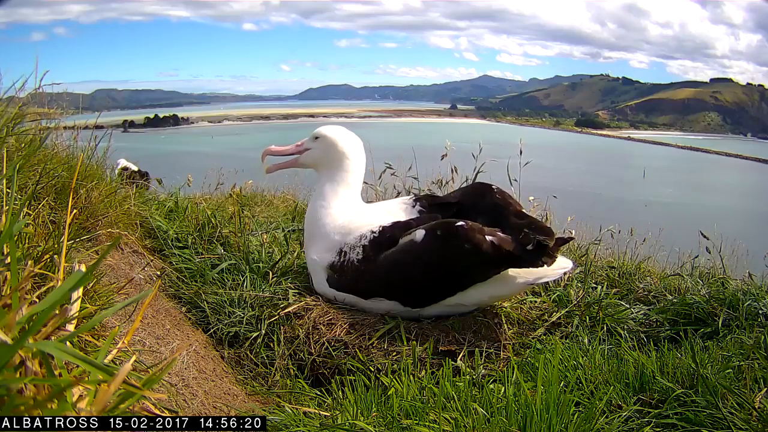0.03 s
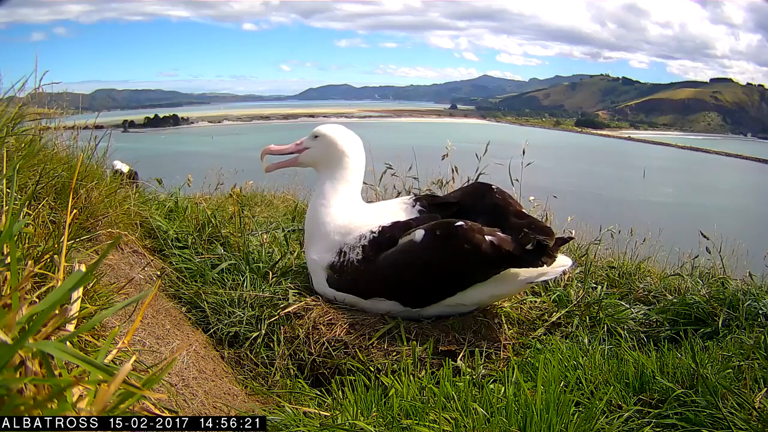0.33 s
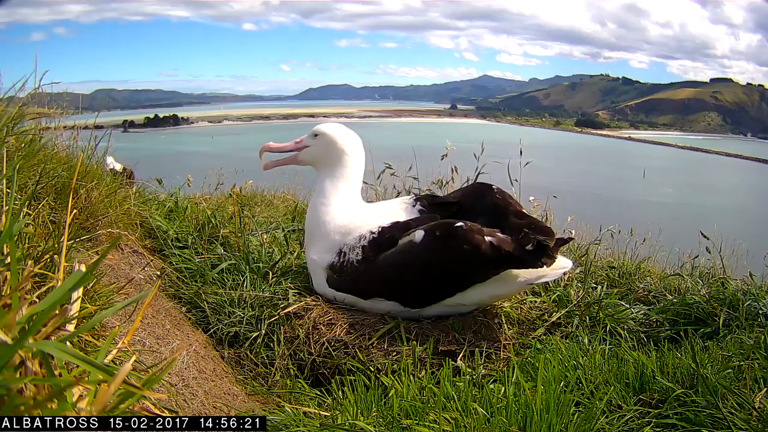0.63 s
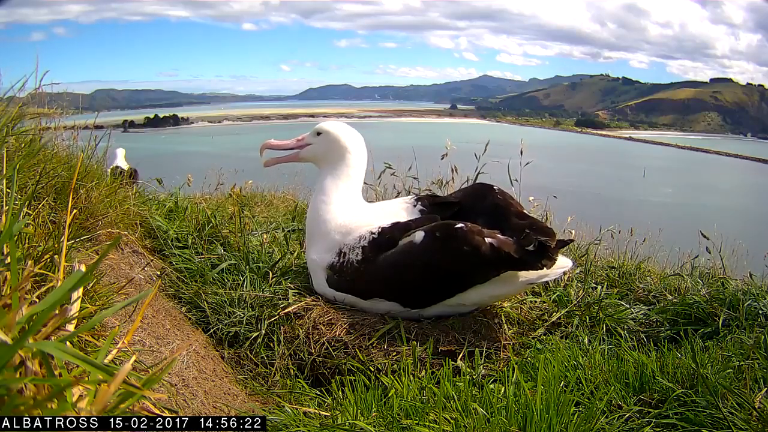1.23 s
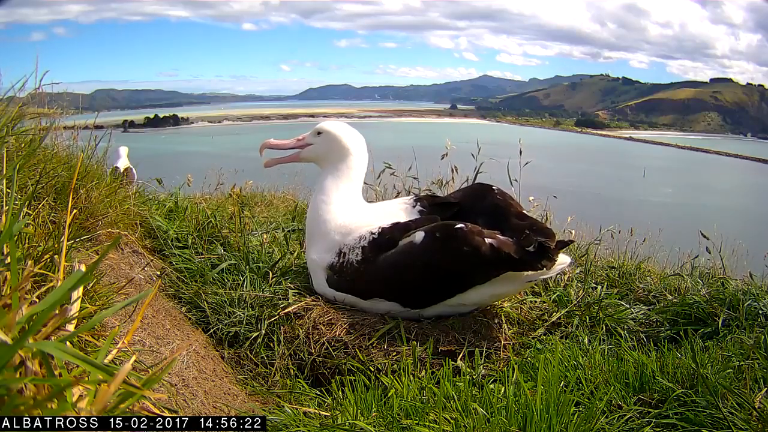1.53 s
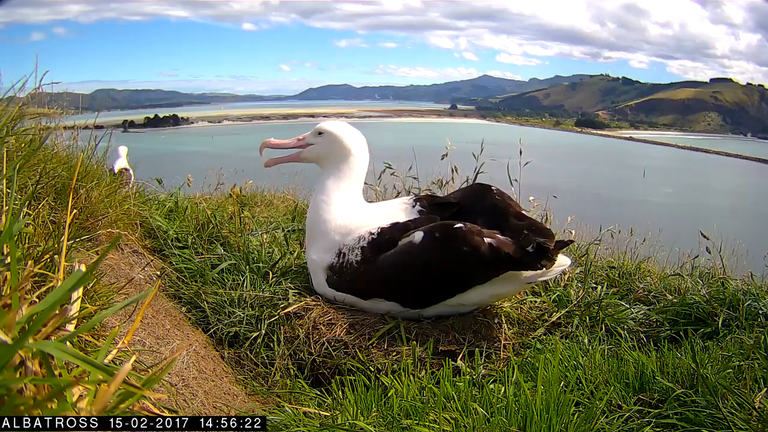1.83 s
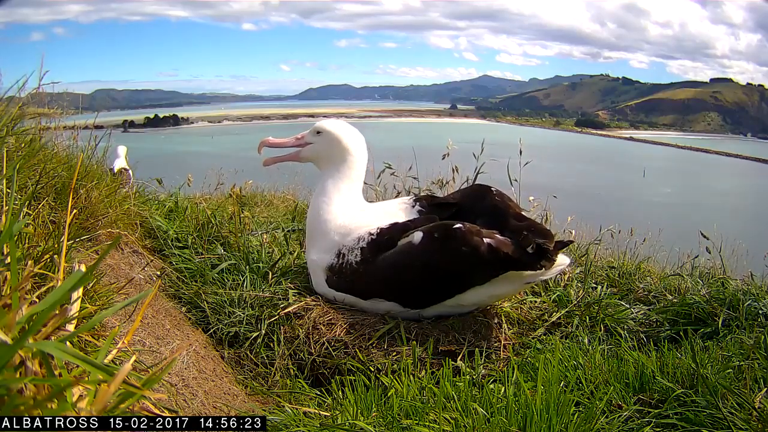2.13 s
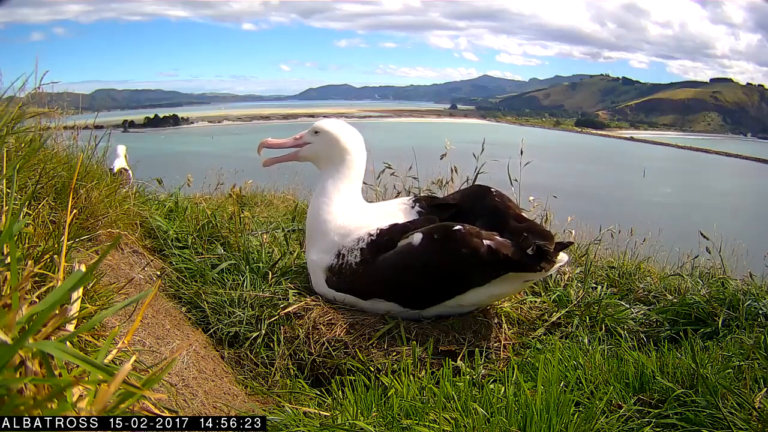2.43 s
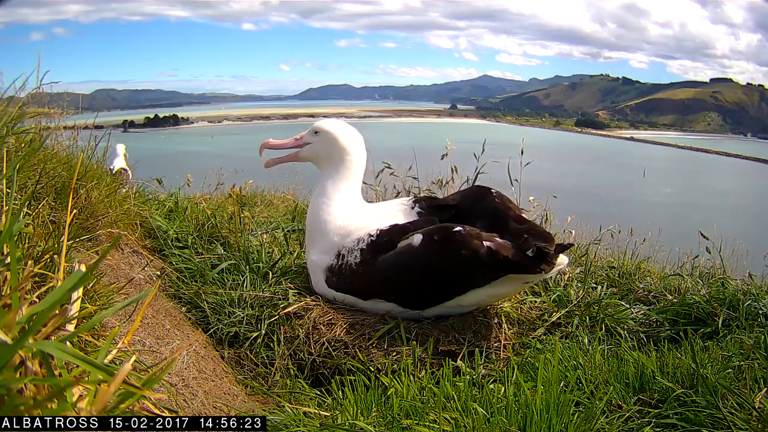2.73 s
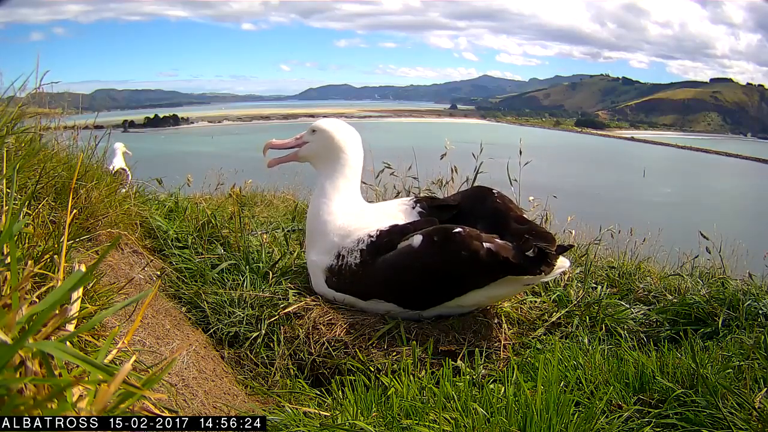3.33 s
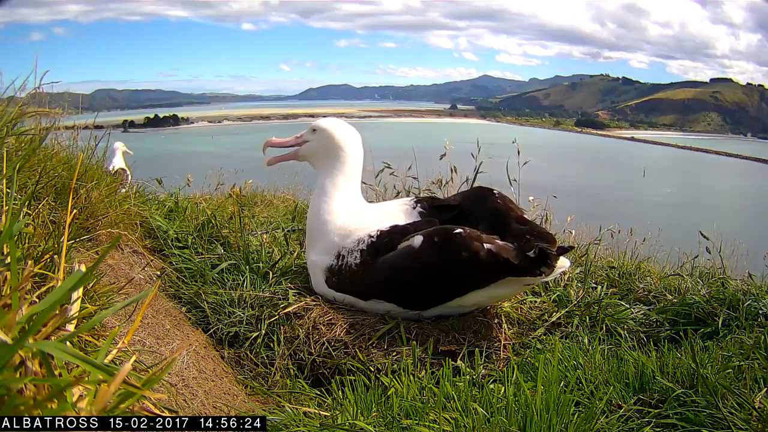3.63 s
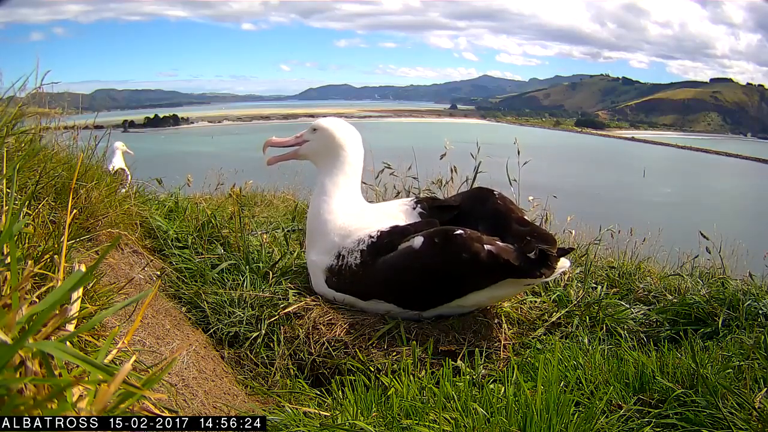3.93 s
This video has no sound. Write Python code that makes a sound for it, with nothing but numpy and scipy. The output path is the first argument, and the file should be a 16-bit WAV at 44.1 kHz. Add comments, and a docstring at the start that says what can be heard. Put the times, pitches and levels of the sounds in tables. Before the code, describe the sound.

Wind rumbles on the microphone over a low hum, with a few sharp clacks and thuds.

```python
"""A low drone, probably the microphone mount shaking in the wind, hums on an exposed headland.
With it come a lumpy rumble, a soft rush of air over the slope and a thin hiss.
A gust throws eddies at the narrow-band microphone, which overloads in sharp clacks and thuds.
Near the end the sound drops out for a moment, then skips with a tick."""
import sys
import numpy as np
from scipy import signal
from scipy.fft import rfft, irfft
from scipy.io import wavfile

SR = 44100
rng = np.random.default_rng(int(sys.argv[2]) if len(sys.argv) > 2 else 0)


def transcribe(u):
    """Save the signal u as a 16-bit wav file named by the first command-line argument.

    u: samples, shape (n,) or (channels, n), limited to [-1, 1]; the rate is SR.
    q: integer samples, one column per channel.
    """
    v = np.clip(np.atleast_2d(u).T, -1, 1)
    q = np.round(v * 32767).astype(np.int16)
    wavfile.write(sys.argv[1], SR, q)


N = 176400
DROPOUT_S = (3.195, 3.3187)  # start, end


def eddies(rasp_lead_s=0.00052, rasp_decay_s=0.0028):
    """Each eddy pushes the diaphragm, flips to suction as it passes, and rasps with fine turbulence."""
    # Eddy strikes. Each row: centre in seconds, pressure gain in dB, push, flip and suction
    # time constants in seconds, rasp gain in dB.
    strikes = [(2.3126, -5, 0.0086, 0.00021, 0.0023, -14), (2.3154, -5, 0.0014, 0.00028, 0.0057, -23),
               (2.323, -4.5, 0.00096, 0.00048, 0.0062, -19), (2.5071, -1, 0.0022, .0002, 0.0054, -17),
               (2.5119, -1, 0.0015, 0.0005, 0.0064, -14.5), (2.5192, -3, 0.0014, 0.00033, .004, -26.5),
               (2.5390, -11, .009, 0.0013, 0.0014, -29.5), (2.5485, -11.5, 0.0016, 0.0013, 0.0081, -28),
               (2.5773, -18.5, 0.01, 0.00081, .004, -29), (2.617, -15, 0.0024, 0.00088, 0.0059, -28.5),
               (2.7112, -10, .003, 0.00088, .007, -29), (2.8098, -1.5, 0.0045, 0.00042, 0.0043, -20.5),
               (2.8345, -11, 0.0078, .0012, 0.0049, -25), (2.91, -6.5, 0.008, 0.00056, 0.0033, -21.5),
               (2.9150, -10.5, 0.0016, 0.00055, 0.0011, -18), (2.918, -1, 0.0028, 0.00029, 0.0035, -6),
               (2.9199, 3.5, 0.00027, .0003, 0.0035, -18.5), (2.9301, -3.5, 0.0018, 0.0011, 0.0027, -28),
               (2.9321, -1, 0.0012, 0.00035, 0.004, -21.5), (2.9388, -14, 0.0038, .0008, 0.0082, -30.5),
               (2.9635, -7, 0.0057, 0.0015, 0.0064, -30.5), (3.0070, -11, 0.0037, 0.0015, 0.0077, -27),
               (3.0350, -12, 0.0057, 0.0014, 0.0076, -23.5), (3.0467, -8.5, 0.0027, 0.00083, 0.0057, -24.5),
               (3.1461, -7.5, .002, 0.0013, 0.0084, -25.5), (3.5184, -10, 0.00098, .0007, 0.0069, -25),
               (3.8100, -25, .003, 0.00065, 0.0043, -42)]
    # Turbulence spectrum. Each row: frequency in Hz, relative density in dB.
    rasp_spectrum = [(60, -18), (300, 4), (700, 8.5), (1400, -0.5), (2800, -6.5), (4200, -9.5)]
    pressure, rasp_envelope = np.zeros(N), np.zeros(N)
    for centre_s, pressure_db, push_s, flip_s, suction_s, rasp_db in strikes:
        t = np.arange(N) / SR - centre_s
        width_s = np.where(t < 0, push_s, suction_s)
        pressure -= amp(pressure_db) * np.tanh(t / flip_s) * np.exp(-(t / width_s) ** 2)
        rasp_envelope += amp(rasp_db) * np.exp(-abs(t + rasp_lead_s) / rasp_decay_s)
    return pressure + rasp_envelope * coloured(rasp_spectrum)


def tock(centre_s=3.5168, pitch_hz=1300, peak_db=-21, width_s=0.0013):
    """A brief hollow tock on one late clack."""
    t = np.arange(N) / SR - centre_s
    return amp(peak_db) * np.cos(2 * np.pi * pitch_hz * t) * np.exp(-(t / width_s) ** 2)


def drone():
    """Narrow low resonances shaken by the wind."""
    # Resonances. Each row: centre and width in Hz, levels before and after the brief dropout in dB.
    modes = [(59, 15, -28.5, -31), (84.4, 7.7, -31.5, -34.5), (143, 1.7, -49.5, -36.5),
             (167.8, 22, -45, -41), (231.3, 30, -50.5, -48)]
    crossfade = np.interp(np.arange(N) / SR, DROPOUT_S, (0, 1))
    out = np.zeros(N)
    for centre_hz, width_hz, before_db, after_db in modes:
        band = noise(lambda hz: 1 / (1 + (2 * (hz - centre_hz) / width_hz) ** 2))
        out += band * amp(before_db + (after_db - before_db) * crossfade)
    return out


def hum(pitch_hz=92.06, waver=0.00798, flutter_db=1.5):
    """The drone's tonal part: a wavering fundamental and its octave."""
    # Hum envelope. Each row: time in seconds, fundamental and octave levels in dB.
    levels = [(0, -38, -37.5), (.9, -30.5, -39.5), (1.4, -27, -48), (2.0, -31.5, -38), (3.1, -26.5, -50),
              (3.55, -24, -34.5), (3.75, -20, -32), (4, -19.5, -33.5)]
    wavering_hz = pitch_hz * (1 + waver * drift(rate_hz=6.21))
    phase = 2 * np.pi * (np.cumsum(wavering_hz) / SR + rng.random())
    out = np.zeros(N)
    for harmonic, level_db in enumerate(curves(levels), 1):
        rms = amp(level_db + flutter_db * drift(rate_hz=9))
        out += np.sqrt(2) * rms * np.sin(harmonic * phase)
    return out


def wind(lump_db=2, flicker_db=0.5):
    """Lumpy rumble at the microphone, air rushing evenly over the slope, and thin hiss."""
    # Wind strength. Each row: time in seconds, rumble, rush and hiss levels in dB.
    levels = [(0, -29.5, -40.5, -58), (1.0, -28, -43.5, -57), (2.2, -30, -45.5, -57),
              (2.45, -28, -44.5, -54), (2.58, -39, -41.5, -49), (2.66, -24.5, -44, -54.5),
              (2.8, -31.5, -46.5, -54.5), (2.98, -38.5, -41.5, -49.5), (3.1, -29, -46, -53.5),
              (3.4, -30, -47.5, -55.5), (4, -24, -47, -54.5)]
    # Wind spectra. Each row: frequency in Hz, relative density in dB.
    rumble_spectrum = [(8, -12.5), (25, -4.5), (45, 4.5), (95, 1.5), (120, -8.5), (200, -13.5),
                       (300, -21.5), (500, -34), (1200, -54)]
    rush_spectrum = [(100, 1.5), (280, 1.5), (420, -1), (520, -3.5), (700, -2), (880, -0.5), (1080, -8.5),
                     (1400, -19.5), (2200, -29)]
    hiss_spectrum = [(200, 1.5), (1200, 4.5), (1900, 3), (2900, 5), (3700, 4), (4300, -10)]
    rumble_db, rush_db, hiss_db = curves(levels)
    rumble = coloured(rumble_spectrum) * amp(rumble_db + lump_db * drift(rate_hz=17))
    rush = coloured(rush_spectrum) * amp(rush_db)
    hiss = coloured(hiss_spectrum) * amp(hiss_db)
    flicker = amp(flicker_db * drift(rate_hz=37))
    return rumble + (rush + hiss) * flicker


def tick(start_s, step_db, decay_s=0.0015):
    """A signal jump that settles quickly."""
    t = np.arange(N) / SR - start_s
    return amp(step_db) * (t >= 0) * np.exp(-abs(t) / decay_s)


def amp(db):
    """Decibels to gain."""
    return 10 ** (np.asarray(db) / 20)


def noise(gain_at_hz):
    """Spectrally shaped noise, unit rms."""
    white = rfft(rng.standard_normal(N))
    x = irfft(white * gain_at_hz(np.fft.rfftfreq(N, 1 / SR)), N)
    return x / np.sqrt(np.mean(x ** 2) + 1e-20)


def coloured(spectrum):
    """Unit-rms noise shaped by (Hz, dB) points."""
    hz, db = np.transpose(spectrum)
    return noise(lambda f: amp(np.interp(np.log(f + 1), np.log(hz), db)))


def drift(rate_hz):
    """Slow random wander, unit rms."""
    return noise(lambda hz: 1 / (1 + (hz / rate_hz) ** 2) ** 2)


def curves(table):
    """A time table's columns, interpolated per sample."""
    times_s, *columns = np.transpose(table)
    return [np.interp(np.arange(N) / SR, times_s, column) for column in columns]


def lowpass(x, cutoff_hz):
    """Steep band limit."""
    return signal.oaconvolve(x, signal.firwin(255, cutoff_hz, window="blackman", fs=SR), "same")


def scene():
    """Air pressure at the microphone, mono."""
    return (wind() + drone() + hum() + eddies() + tock())[None]


def record(dry, overload=0.232, knee=6):
    """The microphone overloads and is band-limited; the signal drops out once and skips once."""
    clipped = dry[0] / (1 + abs(dry[0] / overload) ** knee) ** (1 / knee)
    narrow = lowpass(clipped, cutoff_hz=4180)
    t = np.arange(N) / SR
    gate = (t < DROPOUT_S[0]) | (t > DROPOUT_S[1])
    edge_ticks = sum(tick(edge_s, step_db=-20) for edge_s in DROPOUT_S)
    interrupted = lowpass(narrow * gate + edge_ticks, cutoff_hz=5700)
    skip = tick(start_s=3.6816, step_db=-15)
    return lowpass(interrupted + skip, cutoff_hz=16000)[None]


dry = scene()
out = record(dry)
transcribe(out)
```